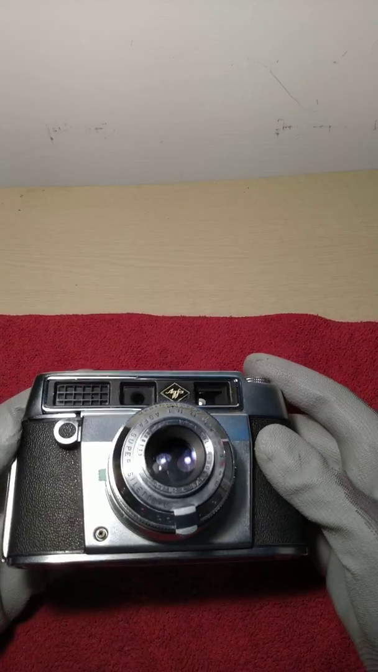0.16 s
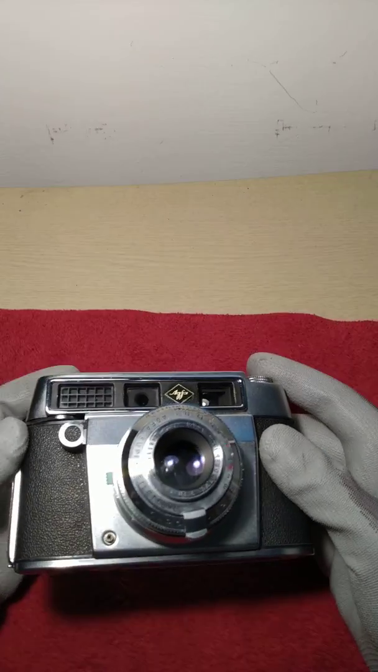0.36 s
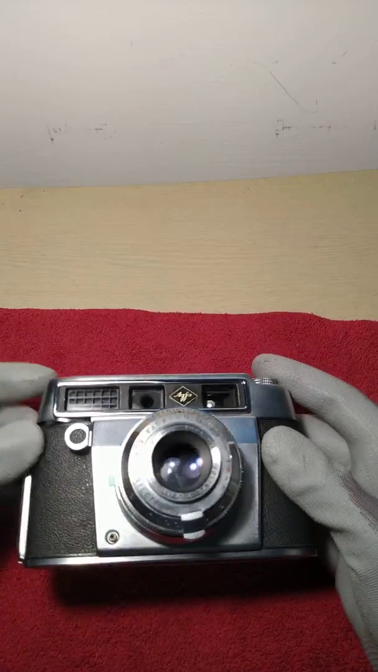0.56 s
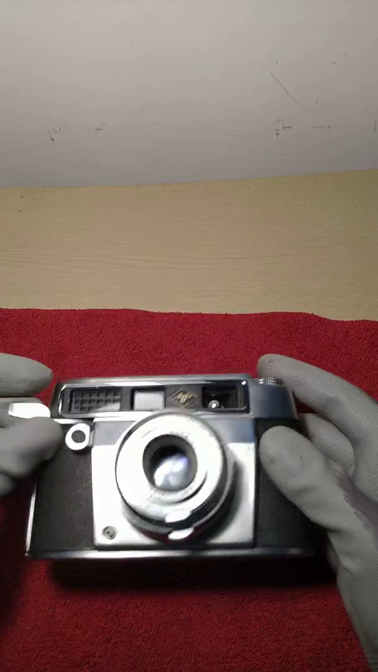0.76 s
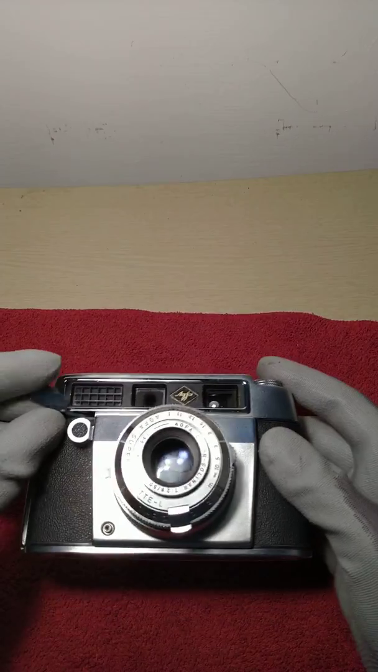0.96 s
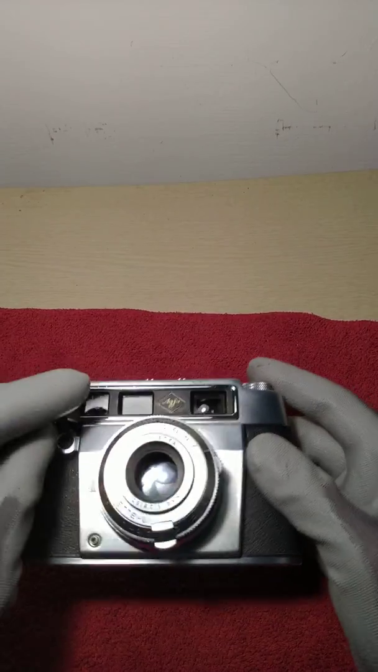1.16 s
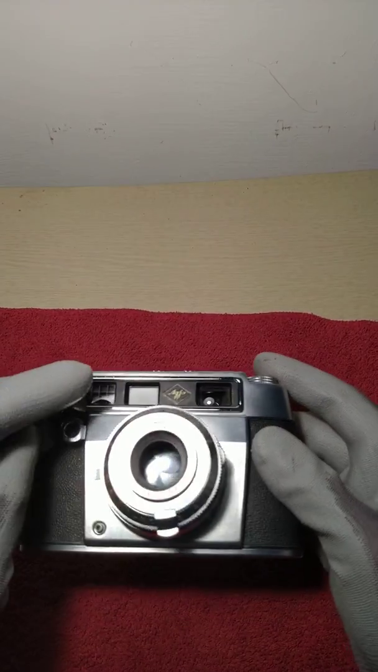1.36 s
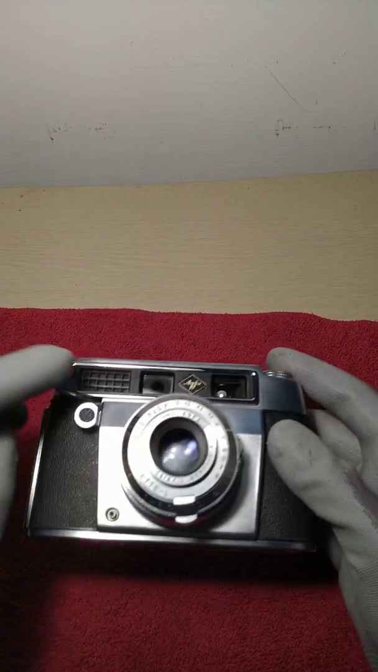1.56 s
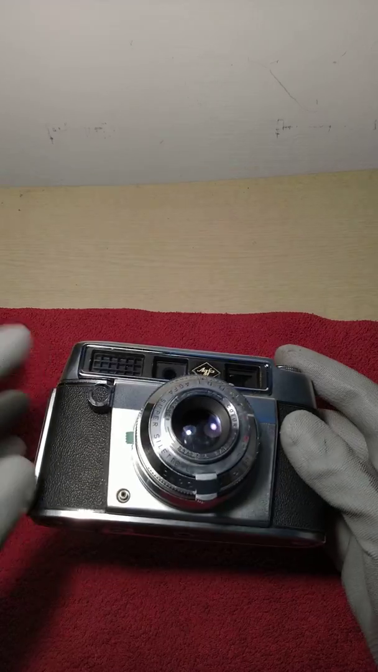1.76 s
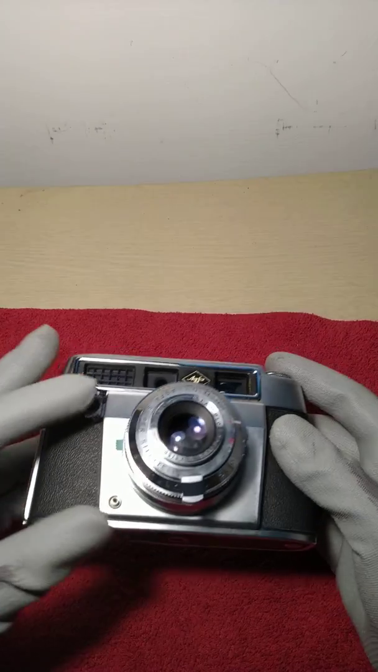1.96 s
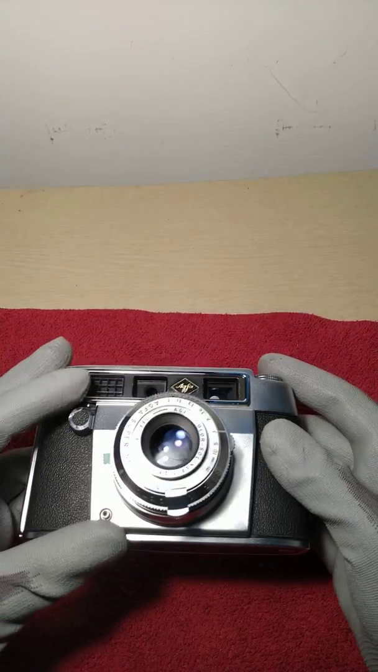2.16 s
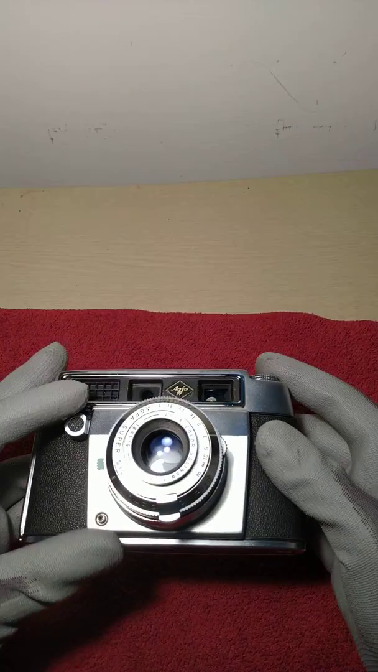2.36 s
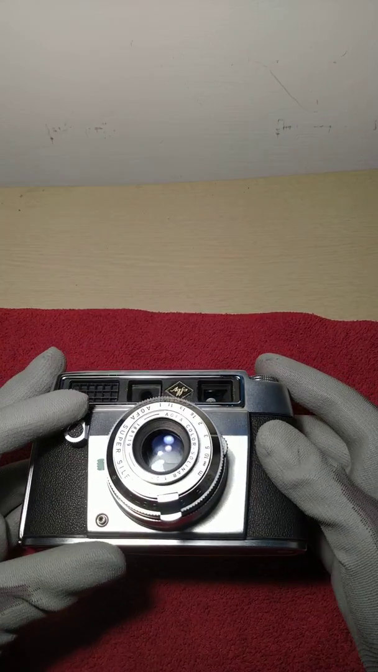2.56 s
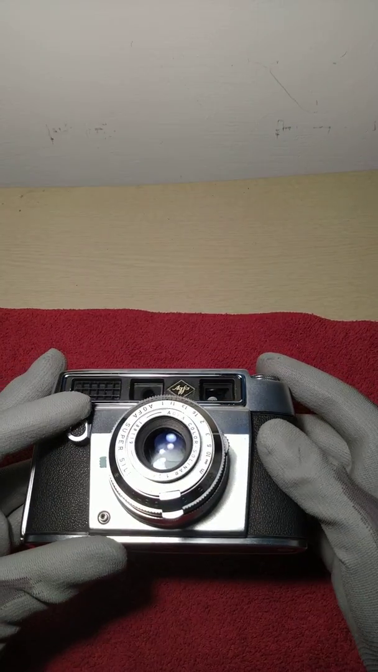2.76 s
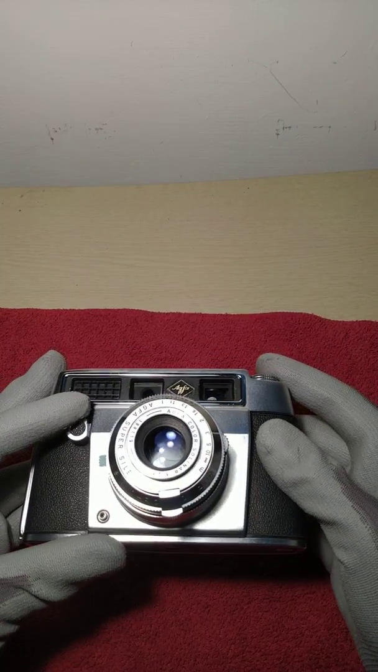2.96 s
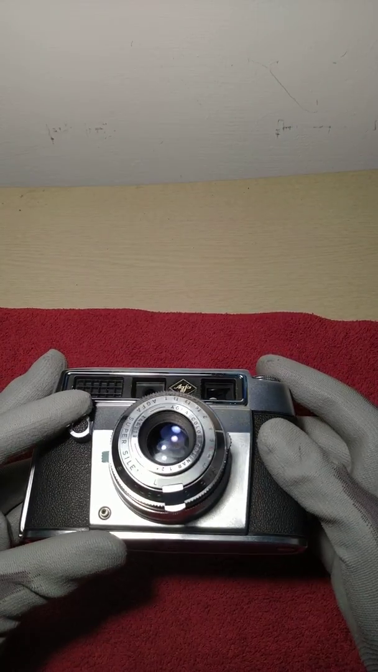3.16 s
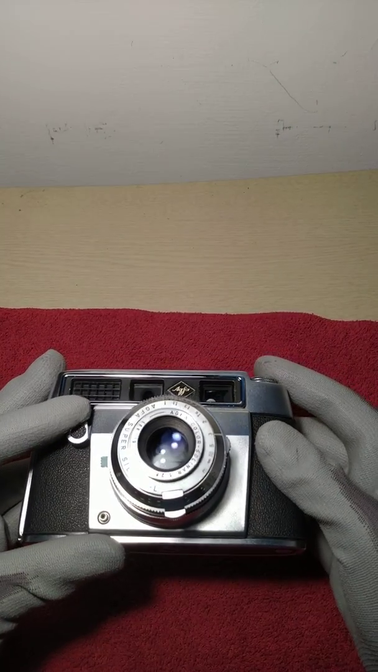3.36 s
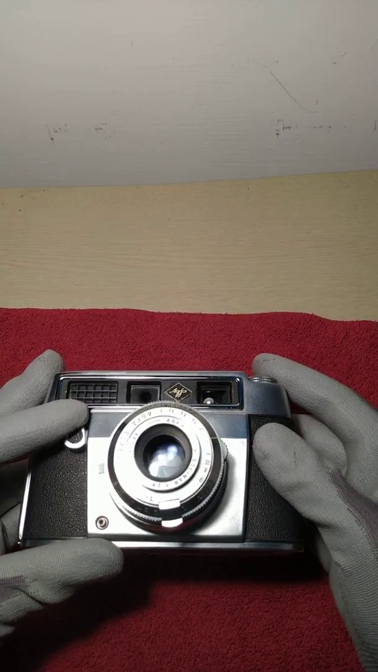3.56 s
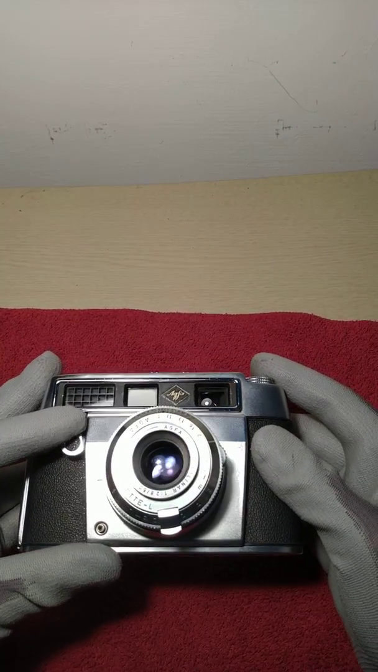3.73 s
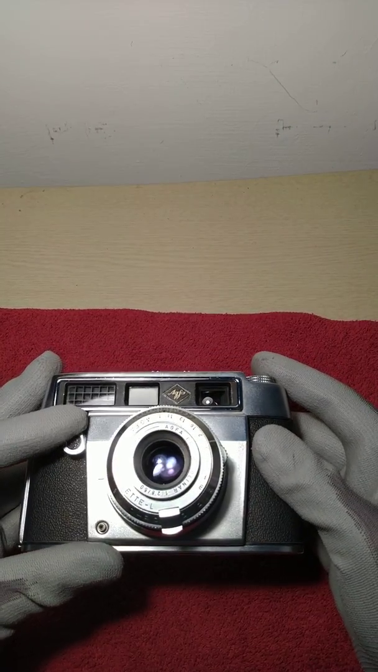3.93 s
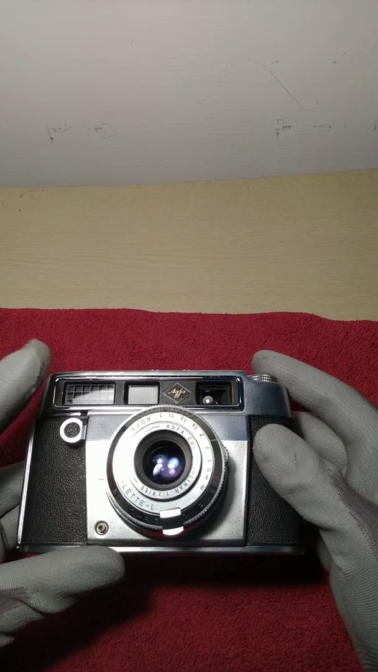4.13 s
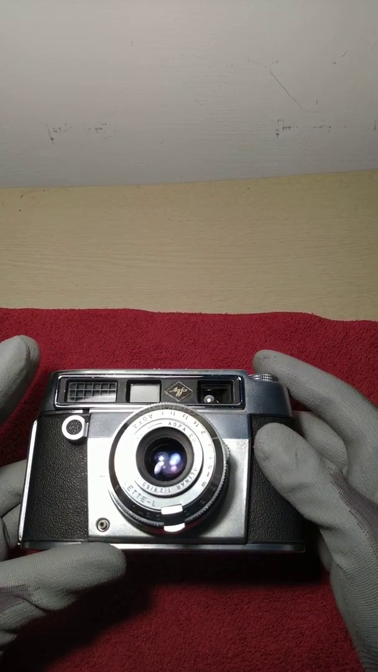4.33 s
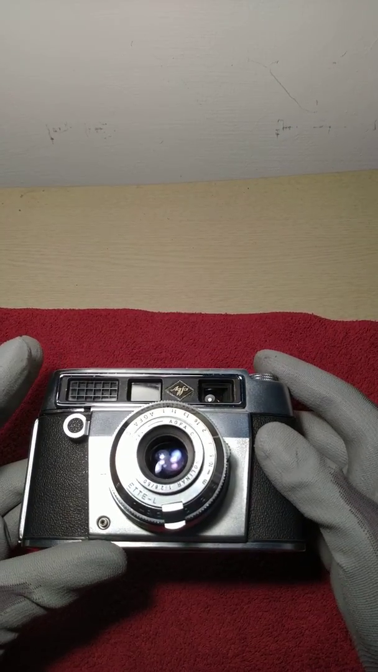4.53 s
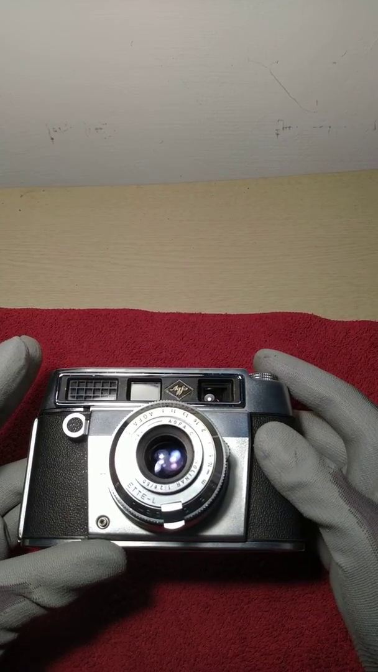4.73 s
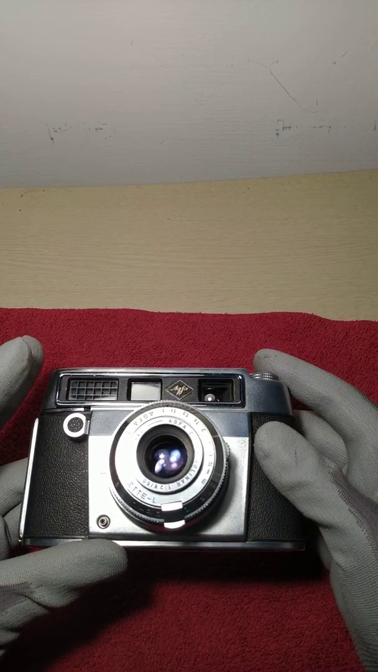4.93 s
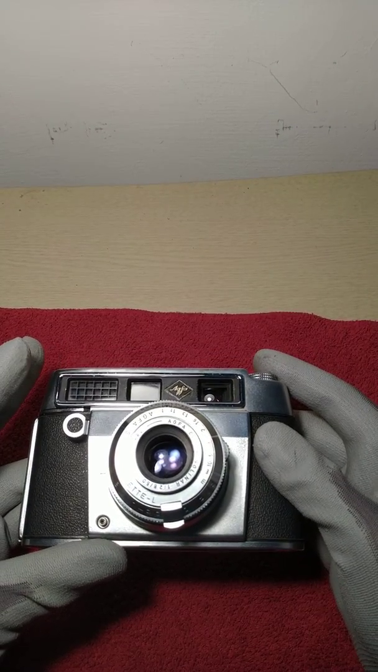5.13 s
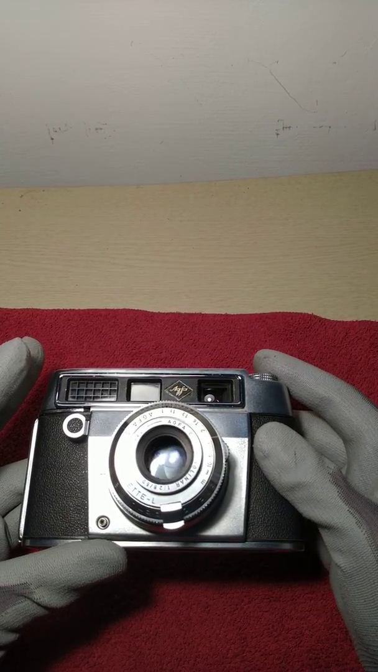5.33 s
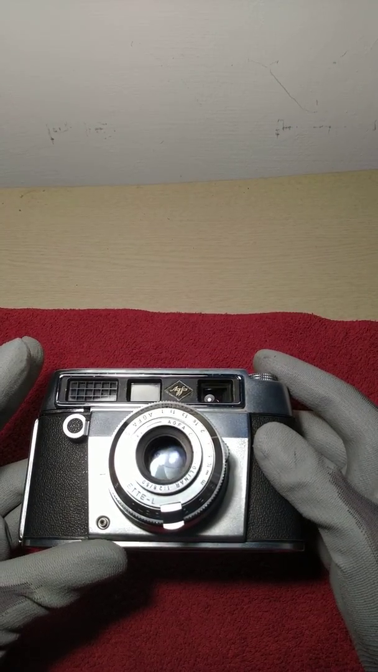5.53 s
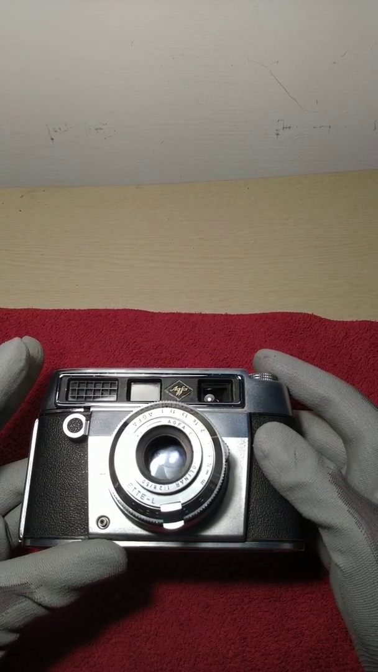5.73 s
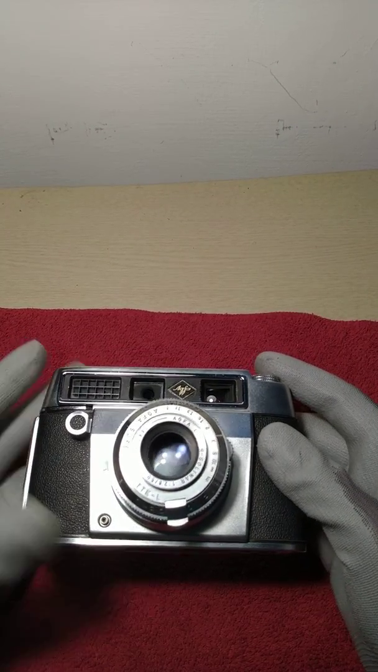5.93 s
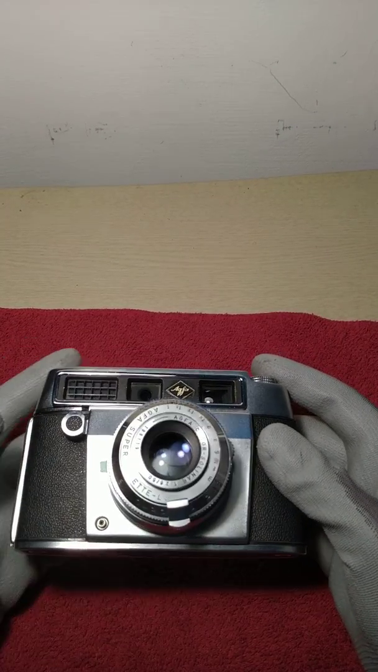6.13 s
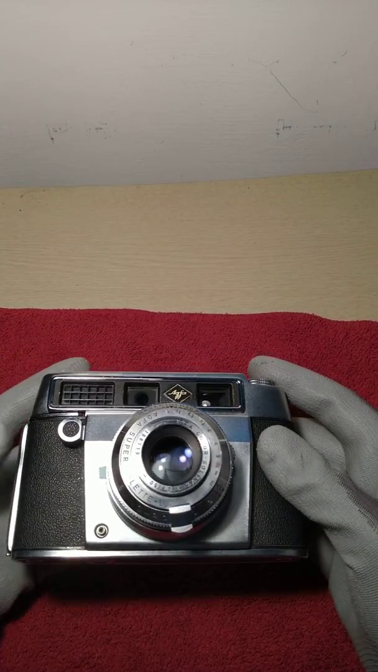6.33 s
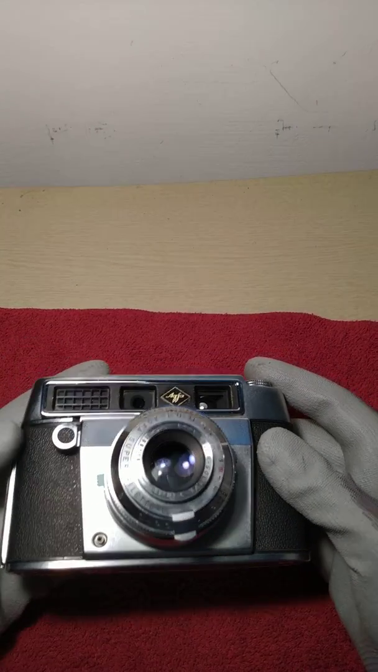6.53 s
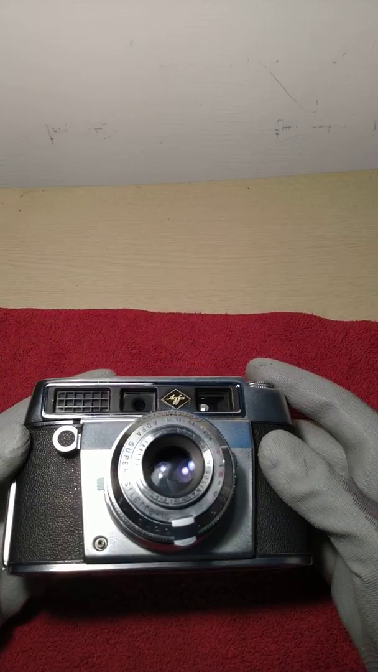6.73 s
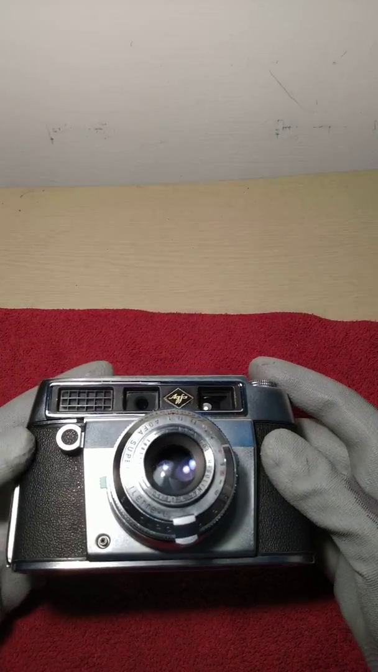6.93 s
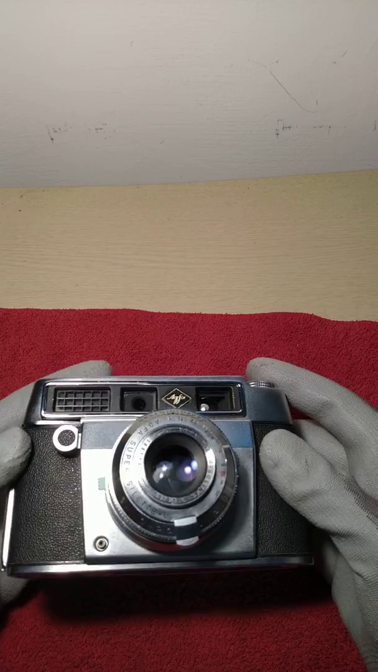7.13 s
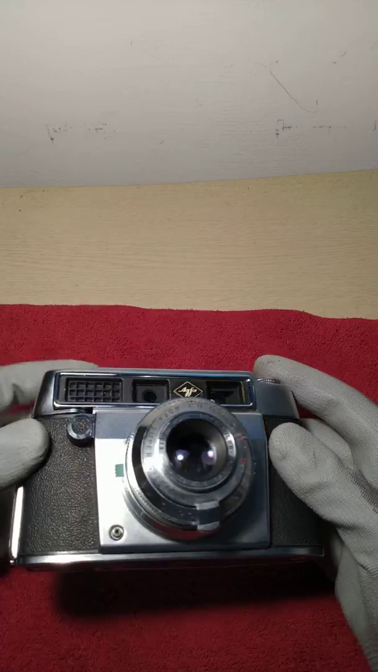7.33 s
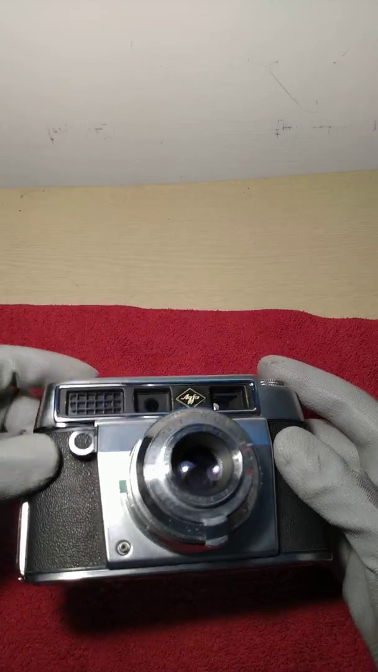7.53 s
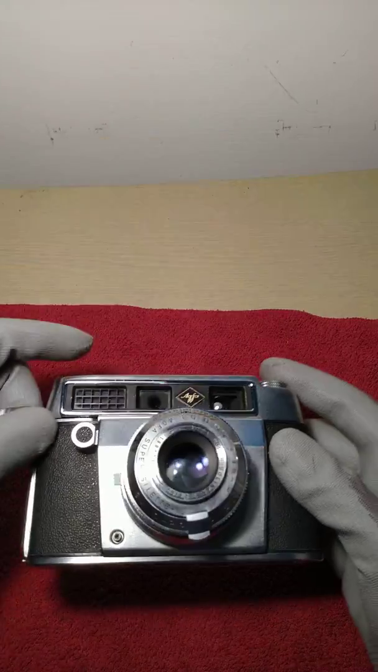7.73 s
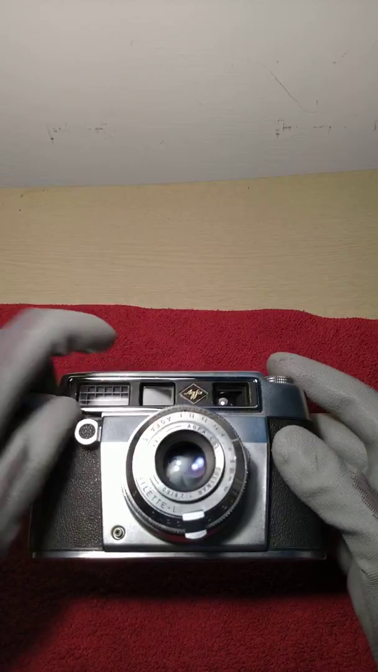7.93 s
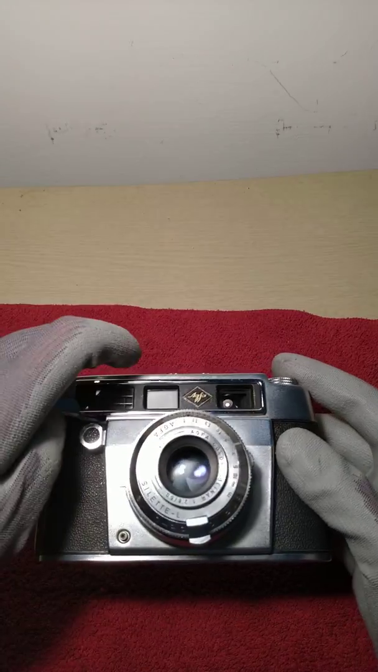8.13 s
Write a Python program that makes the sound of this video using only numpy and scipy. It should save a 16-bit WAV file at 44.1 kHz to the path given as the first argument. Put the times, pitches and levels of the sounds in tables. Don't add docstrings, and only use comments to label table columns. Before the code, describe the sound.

A film camera lever ratchets in crisp clicks and snaps back hard, then the shutter clicks, buzzes slowly and closes over faint room hum.

```python
import sys
import numpy as np
from scipy import signal
from scipy.fft import rfft, irfft, next_fast_len
from scipy.io import wavfile
from scipy.ndimage import uniform_filter1d

SR = 44100
rng = np.random.default_rng(int(sys.argv[2]) if len(sys.argv) > 2 else 0)


def unload_wav(signal):
    wavfile.write(
        sys.argv[1],
        SR,
        np.round(np.clip(np.atleast_2d(signal).T, -1, 1) * 32767).astype(np.int16),
    )


def elevation(decibels):
    levels = np.asarray(decibels, float)
    return 10 ** (levels / 20)


N = 365588


def rms_one(x):
    return x / np.sqrt(np.mean(x ** 2) + 1e-20)


def in_time(rows):
    s, *columns = np.transpose(rows)
    t = np.arange(N) / SR
    inside = np.clip(np.minimum(t - s[0], s[-1] - t) / 0.0033, 0, 1)
    return [inside] + [np.interp(t, s, c) for c in columns]


def at_hz(points, hz):
    points = np.array(points, float)
    return np.interp(np.log(hz), np.log(points[:, 0] + 1), points[:, 1])


def drift(rate_hz):
    r = np.exp(-80 * np.pi * rate_hz / SR)
    slow = signal.lfilter([1], [1, -2 * r, r * r], rng.standard_normal(N // 40 + 2002))[2000:]
    return np.interp(np.arange(N) / 40, np.arange(len(slow)), rms_one(slow))


def band(x, edges_hz):
    return signal.sosfilt(signal.butter(3, edges_hz, "band", fs=SR, output="sos"), x)


def resonate(x, modes, spread_db):
    out = 0
    for k, (hz, width_hz, db) in enumerate(modes):
        r = np.exp(-np.pi * width_hz / SR)
        sign = [[(-1) ** k], [rng.choice([-1, 1])]]
        heard = elevation(db + spread_db * rng.standard_normal((2, 1))) * sign
        poles = [1, -2 * r * np.cos(2 * np.pi * hz / SR), r * r]
        ringing = signal.lfilter([1, 0, -1], poles, x + 1e-18)
        out = out + heard * ringing * (1 - r * r) / np.sqrt(1 - r)
    return out


def grains(size, per_s, uneven_db, shared):
    hit = rng.random(size) < per_s / SR
    strength = elevation(uneven_db * np.minimum(rng.exponential(1, size), 4))
    alike = shared * rng.standard_normal(size)
    own = (1 - shared) * rng.standard_normal((2, size))
    return hit * strength * (alike + own)


# time in seconds, level in dB at 60 Hz.
HUM_LEVEL = [(0, -51.5), (1.0, -54), (1.6, -49), (2.9, -57), (3.55, -50), (4.4, -50.5), (5.3, -48),
             (6.23, -49.5), (6.76, -48.5), (7.53, -52), (8.29, -48.5)]


def hum():
    t = np.arange(N) / SR + [[0], [-.0004]]
    _, load_db = in_time(HUM_LEVEL)
    first_db = load_db + 0.67 * drift(6.8)
    second_db = -55.5 + 0.23 * (load_db - load_db.mean()) + 1.64 * drift(3.0)
    out = 0
    for hz, db in (60, first_db), (120, second_db):
        out = out + elevation(db) * np.sqrt(2) * np.sin(2 * np.pi * (hz * t + 0.064 * drift(5.5)))
    return out


# frequency in Hz, density in dB per Hz.
AIR = [(28, -22), (50, -9), (90, -8.5), (170, -13), (400, -15), (1000, -14.5), (2000, -18), (4500, -26),
       (6300, -33.5), (8000, -45), (10500, -30), (13000, -31), (15700, -43), (16300, -60)]
# centre in Hz, width in Hz, level in dB.
DUCTS = [(293.3, 45, -59), (410, 74, -53.5), (848, 55, -59.5), (1125, 70, -60)]
# time in seconds, level in dB.
AIR_LEVEL = [(0, -47.5), (2.0, -47.5), (4.1, -46), (6.2, -47), (8.29, -48)]
# frequency in Hz, shared power from 0 to 1.
LIKENESS = [(60, 1), (300, 0.87), (480, 0.97), (560, 0.27), (750, 0.46), (1300, 0.38), (3000, 0.033),
            (8000, .01)]
# frequency in Hz, left minus right in dB.
TILT = [(60, 1.5), (110, 1), (200, 1.5), (380, 3.5), (700, 0.5), (1290, -1), (2380, -1), (4400, -2.5),
        (8120, 0.0), (15000, 2.5)]
LEFT_LEAD_S = 0.0003


def ventilation():
    size = next_fast_len(N)
    hz = np.maximum(np.arange(size // 2 + 1) * SR / size, 10)
    shared, left, right = rfft(rng.standard_normal((3, size)))
    alike = at_hz(LIKENESS, hz)
    late = np.exp(-2j * np.pi * hz * LEFT_LEAD_S * np.clip(hz / 900, 0, 1))
    pair = np.sqrt(alike) * shared * [np.ones_like(late), late]
    pair = pair + np.sqrt(1 - alike) * np.array([left, right])
    pair = pair * elevation(np.array([[.5], [-.5]]) * at_hz(TILT, hz))
    broad = elevation(-46) * rms_one(elevation(at_hz(AIR, hz)))
    ducts = 0
    for centre, width, db in DUCTS:
        ducts = ducts + elevation(2 * db) * SR / 2 / width / (1 + (2 * (hz - centre) / width) ** 4)
    _, db = in_time(AIR_LEVEL)
    return elevation(db - db.mean()) * irfft(pair * np.sqrt(broad ** 2 + ducts), size)[:, :N]


def room(x):
    t60_s, level_db, cut_hz = 0.35, -19, 13400
    t = np.arange(round(.6 * SR)) / SR
    tail = rng.standard_normal((2, len(t))) * elevation(-60 * t / t60_s) * np.clip(t / 0.0037, 0, 1)
    tail = signal.sosfilt(signal.butter(1, cut_hz, fs=SR, output="sos"), tail)
    tail = tail / np.sqrt(np.sum(tail ** 2, axis=1, keepdims=True))
    return elevation(level_db) * signal.fftconvolve(x, tail, axes=1)[:, :N]


# start in seconds, level in dB, pitch in Hz, 60 dB decay in seconds.
JOLTS = [
    (1.7849, -15, 690, 0.0094),
    (1.7855, -20.5, 1240, 0.019),
    (1.7852, -1.5, 400, 0.0045),
    (1.789, -36, 142, 0.021),
    (1.7904, -18.5, 62, 0.14),
    (3.3715, -28.5, 1830, 0.027),
    (4.0571, -23.5, 1200, 0.019),
    (5.3727, -32, 1780, 0.05),
    (8.1226, -39, 1164, 0.06),
]


def jolt(s, db, hz, t60):
    t = np.maximum(np.arange(N) / SR - s, 0)
    return elevation(db - 60 * t / t60) * np.sin(2 * np.pi * hz * t)


# frequency in Hz, width in Hz, level in dB.
SMALL_PARTS = [(9500, 600, -16), (9770, 1200, -6.5), (11360, 870, 1), (12460, 640, -3), (13840, 450, -7),
               (15200, 600, -15.5), (15000, 400, -6.5)]
LEVER_BODY = [(3560, 4100, -3.5), (4020, 960, 3), (4970, 500, -6), (5120, 690, -5.5), (5930, 1550, 1)]
LEVER_CASE = [(623, 180, -16), (1280, 1100, -7), (1830, 1040, -1), (2310, 2070, 0.5), (2870, 490, -9.5)]
# (low Hz, high Hz)
BRIGHT_HZ, BODY_HZ, CASE_HZ = (9040, 17500), (2770, 7100), (530, 3230)
# start in seconds, length in seconds, level in dB, body relative in dB.
SLIDES = [
    (0.45, 0.11, -43, -1.5),
    (0.548, 0.082, -38.5, -4.5),
    (0.75, 0.11, -49, -1),
    (1.33, 0.26, -55, -6),
    (7.362, 0.11, -40, -4),
    (7.456, 0.061, -50, -3),
    (7.557, 0.05, -42, -2),
    (7.61, 0.041, -48, 4),
]


def gears():
    friction = grains(size=N, per_s=5200, uneven_db=-1.0, shared=0.23) * elevation(1.8 * drift(60.))
    bright = rms_one(band(resonate(friction, SMALL_PARTS, spread_db=1.5), BRIGHT_HZ))
    dull = rms_one(band(resonate(friction, LEVER_CASE[2:] + LEVER_BODY, spread_db=5.0), (1500, 6800)))
    t = np.arange(N) / SR
    coast_s, coast_db, coast_body_db, coast_t60_s = 1.79, -23.5, 0.5, 0.33
    coast = (t > coast_s) * elevation(coast_db - 60 * np.maximum(t - coast_s, 0) / coast_t60_s)
    out = coast * (bright + elevation(coast_body_db) * dull)
    for s, length, db, body_db in SLIDES:
        stroke = np.sin(np.pi * np.clip((t - s) / length, 0, 1))
        out = out + stroke * elevation(db) * (bright + elevation(body_db) * dull)
    return out


# time in seconds, ticks per second, level in dB.
ESCAPEMENT = [(3.7, 140, -51), (3.8, 150, -51.5), (4.4, 140, -48.5), (4.5, 140, -47.5), (4.78, 127, -51),
              (4.9, 106, -52), (5.36, 94, -50.5)]
# frequency in Hz, width in Hz, level in dB.
ESCAPEMENT_PARTS = [(4020, 220, -11), (6200, 880, -12), (9170, 240, -11.5), (10200, 170, -14),
                    (11400, 410, -6), (12300, 570, -1.5), (12950, 310, -1.5), (13900, 480, -3.5),
                    (14800, 600, -9), (15500, 300, -5)]


def escapement():
    running, per_s, db = in_time(ESCAPEMENT)
    tooth = np.floor(np.cumsum(per_s * (1 + .06 * drift(40.))) / SR).astype(int)
    count = tooth[-1] + 1
    tick_tock_db = 3.1 * (-1) ** np.arange(count)
    strength_db = 2.9 * rng.standard_normal(count) + tick_tock_db
    ticks = (np.diff(tooth, prepend=0) > 0) * elevation(strength_db[tooth])
    fade = np.exp(-1 / (.0015 * SR))
    whirr = 0.26
    rattle = signal.lfilter([1], [1, -fade], ticks) + whirr
    rattle = rattle * grains(size=N, per_s=15000, uneven_db=0.5, shared=0)
    ringing = band(resonate(rattle, ESCAPEMENT_PARTS, spread_db=1.0), (3000, 15900))
    return running * elevation(db) * rms_one(ringing)


def contacts(rows, touch, body, case):
    t60_s, longer_db_per_db, pan_db = touch
    size = 2048
    out = np.zeros((2, N + size))
    t = np.arange(size) / SR
    pan = elevation(np.array([[.5], [-.5]]) * pan_db)
    for s, db, body_db, case_db in rows:
        t60 = t60_s * elevation(longer_db_per_db * (-20.5 - db))
        rattle = grains(size=size, per_s=12000, uneven_db=3.5, shared=0.54)
        rattle = rattle * elevation(-60 * t / t60) * (1 - np.exp(-t / 0.00016))
        rattle[:, 8] += 3.84 * min(0.021 / t60, 1.5)
        groups = ((SMALL_PARTS, BRIGHT_HZ, db), (body, BODY_HZ, db + body_db), (case, CASE_HZ, db + case_db))
        for modes, edges_hz, level_db in groups:
            ringing = band(resonate(rattle, modes, spread_db=3.0), edges_hz)
            left, right = (rms_one(x) for x in ringing)
            alike, unlike = rms_one(left + right), rms_one(left - right)
            peak = np.sqrt(2 * uniform_filter1d(alike ** 2, size=40).max())
            pair = np.array([alike + unlike, alike - unlike]) / peak
            start = round(s * SR)
            out[:, start:start + size] += elevation(level_db) * pan * pair
    return out[:, :N]


# start in
# seconds, peak of the small parts in dB, body relative in dB.
PAWL_DROPS = [(0.307, -21.5, -15), (0.349, -22, -16), (0.3758, -24, -16), (0.448, -24.5, -18),
              (0.489, -36, -4), (0.503, -34, -11), (0.5232, -24.5, -15), (0.5898, -25, -13),
              (0.6165, -21.5, -12), (0.6368, -23, -16), (0.655, -23.5, -16), (0.7522, -23, -16),
              (0.7884, -19.5, -14.5), (0.814, -22.5, -14), (0.842, -19.5, -20), (1.019, -22.5, -15),
              (1.1613, -18, -12), (1.1652, -17, -23),
              (7.199, -20.5, -19), (7.2362, -23, -18), (7.2697, -27.5, -15), (7.3319, -26.5, -19),
               (7.394, -37, -9), (7.416, -34, -17), (7.4283, -25, -23), (7.5437, -25, -16),
               (7.5905, -19, -13), (7.6115, -22, -20), (7.6258, -23, -10), (7.6393, -22, -13.5),
               (7.6626, -26, -13), (7.8867, -21.5, -16), (7.9811, -19, -16)]
# start in seconds, peak of the small parts in dB, body relative in dB, case relative in dB.
LEVER_STOPS = [
    (0.319, -43.5, 3, 2),
    (1.0976, -46.5, 3.5, 1),
    (1.181, -17.5, -7, -10),
    (1.19, -19, -2.5, -4),
    (2.0237, -43, 3.5, 4.5),
    (6.9365, -50.5, 8, 9),
    (7.1735, -46.5, -7, 7),
    (7.2076, -40, 7, -8),
    (7.8528, -47, 5, -8),
    (8.1224, -24.5, -2.5, -5),
]
LEVER_RETURN = [
    (1.769, -12, -16, -21),
    (1.7847, 0, -4.5, -6),
    (1.7876, -15, -9, 1.5),
    (1.8003, -21, 4, -6),
    (1.8149, -27.5, 0, 1),
    (1.8417, -34, -9, -3),
]
# 60 dB decay in seconds at -20.5 dB, dB longer per dB softer, left minus right in dB
PAWL_TOUCH, STOP_TOUCH, RETURN_TOUCH = (0.016, 0.45, 2.8), (0.027, 0.12, -2.7), (0.038, 0.42, .6)


def lever():
    pawl = [(*row, -20) for row in PAWL_DROPS]
    out = contacts(pawl, PAWL_TOUCH, LEVER_BODY, LEVER_CASE)
    out = out + contacts(LEVER_STOPS, STOP_TOUCH, LEVER_BODY, LEVER_CASE)
    return out + contacts(LEVER_RETURN, RETURN_TOUCH, LEVER_BODY, LEVER_CASE)


# start in seconds, peak of the small parts in dB, body relative in dB, case relative in dB.
SHUTTER = [(3.3723, -10.5, -11, -21), (3.3765, -20, -13, -16), (3.6722, -25, -12, -5),
           (3.6763, -19.5, 3, -4), (3.6818, -11, 0, -10), (3.6836, -7, -6, -22), (3.6875, -17, -3, -20),
           (3.692, -14, -15, -11), (3.696, -19, -15, -27), (4.0384, -38, -2, -6), (4.044, -25, -16, -9),
           (4.0562, -5.5, -9.5, -10.5), (4.0585, -13, -1, -11), (4.3914, -49, -14, -18),
           (5.3666, -22.5, -4, -21), (5.369, -24, -6, -11), (5.3727, -19, -3.5, -14)]
# frequency in Hz, width in Hz, level in dB.
SHUTTER_BODY = [(3140, 380, -17), (3960, 260, -5.5), (4500, 280, -12.5), (5000, 570, -7.5), (6170, 970, -9)]
SHUTTER_CASE = [(1120, 280, -10.5), (1780, 81, -10), (2110, 270, -1), (2740, 740, 4.5)]
SHUTTER_TOUCH = (0.02, 0.23, 1.4)


def shutter():
    return contacts(SHUTTER, SHUTTER_TOUCH, SHUTTER_BODY, SHUTTER_CASE)


def scene():
    background = hum() + ventilation()
    camera = gears() + escapement() + lever() + shutter()
    knocks = sum(jolt(*row) for row in JOLTS)
    return camera + room(camera) + knocks + background


def band_limit(x):
    return signal.sosfilt(signal.butter(12, 16970, fs=SR, output="sos"), x)


def record(dry):
    low_cut_hz, top_cut_hz, overload = 38, 16700, .72
    duck_above_db, duck_share, recover_db_per_s = -20.5, 0.24, 17
    dry = signal.sosfilt(signal.butter(3, low_cut_hz, "high", fs=SR, output="sos"), dry)
    level_db = 10 * np.log10(uniform_filter1d(np.mean(dry ** 2, axis=0), size=220) + 1e-12)
    ramp = recover_db_per_s * np.arange(N) / SR
    wanted_db = duck_share * np.maximum(level_db - duck_above_db, 0)
    cut_db = np.maximum.accumulate(wanted_db + ramp) - ramp
    ducked = dry * elevation(-uniform_filter1d(cut_db, size=200))
    rounded = overload * np.tanh(ducked / overload)
    mix = signal.sosfilt(signal.cheby2(10, 50, top_cut_hz, fs=SR, output="sos"), rounded)
    return band_limit(mix)


dry = scene()
out = record(dry)
unload_wav(out)
```